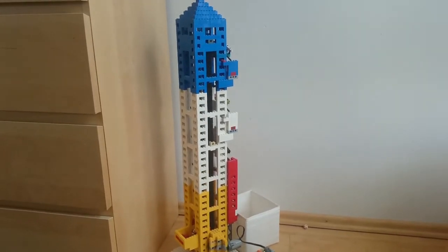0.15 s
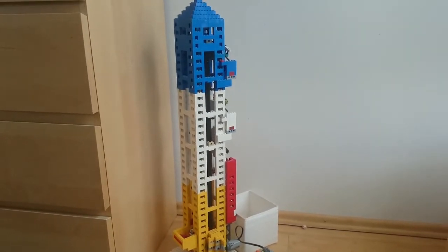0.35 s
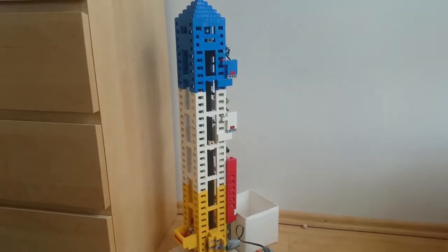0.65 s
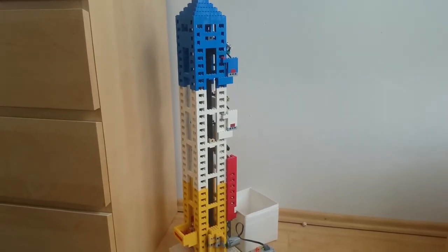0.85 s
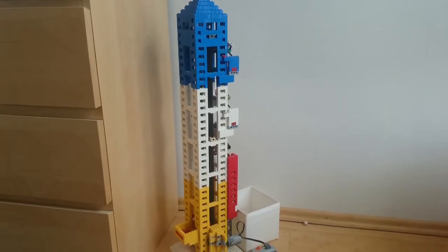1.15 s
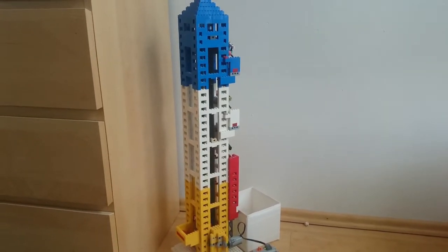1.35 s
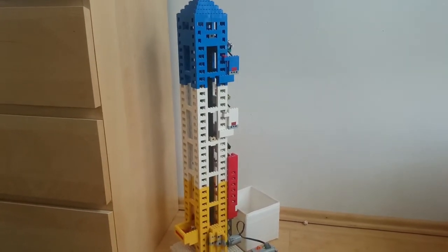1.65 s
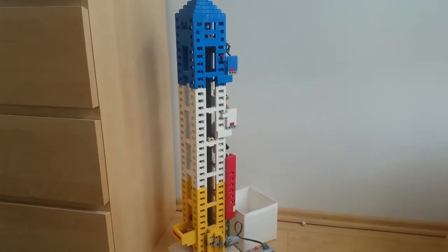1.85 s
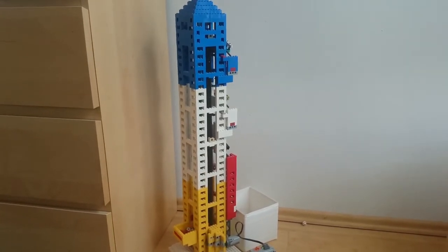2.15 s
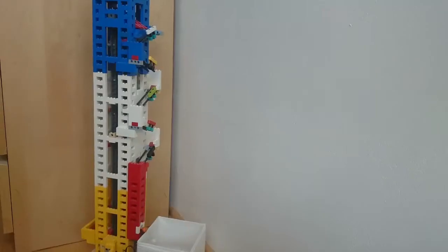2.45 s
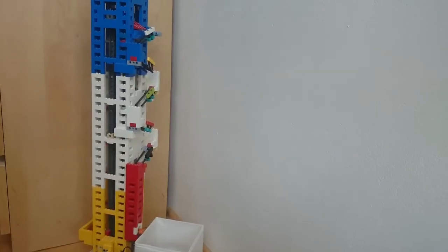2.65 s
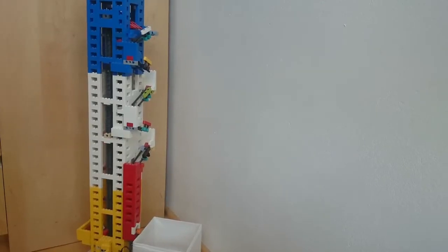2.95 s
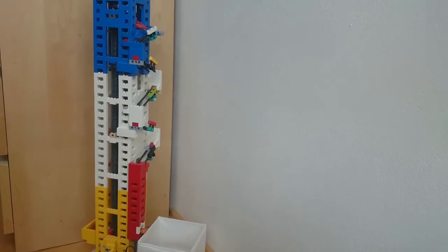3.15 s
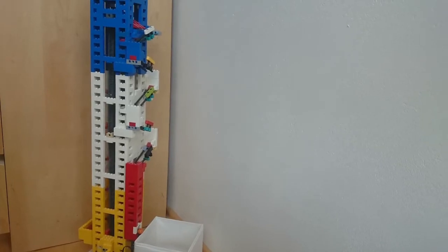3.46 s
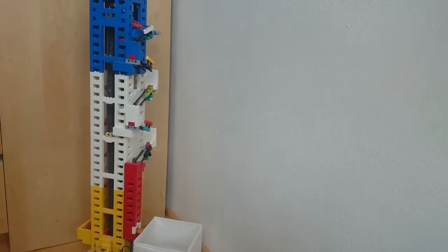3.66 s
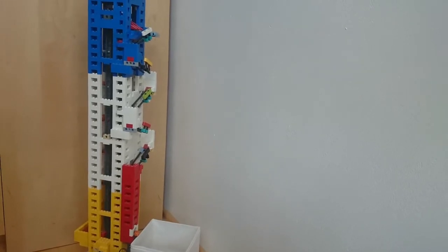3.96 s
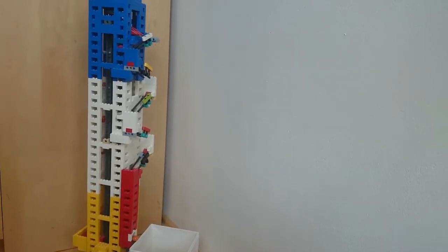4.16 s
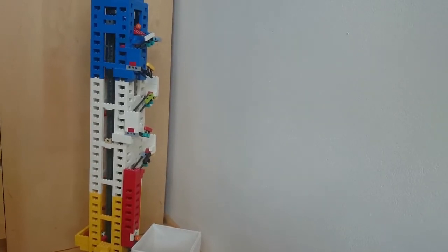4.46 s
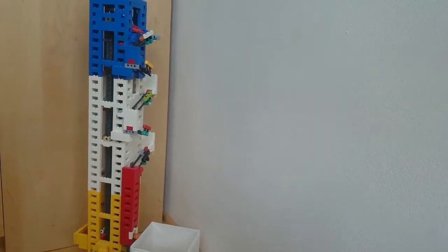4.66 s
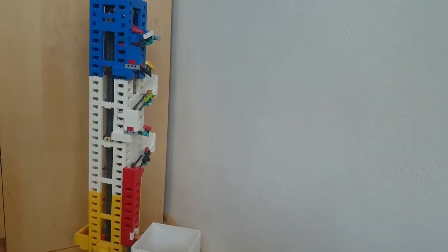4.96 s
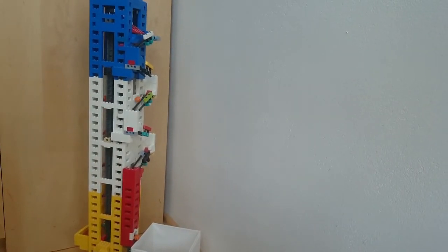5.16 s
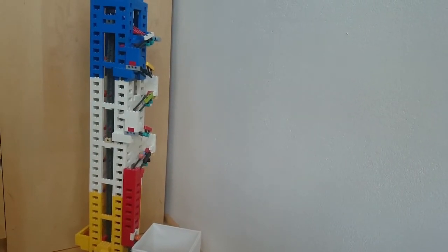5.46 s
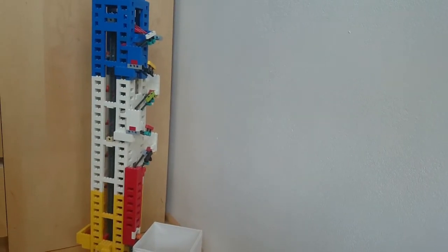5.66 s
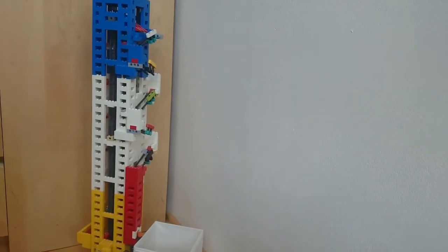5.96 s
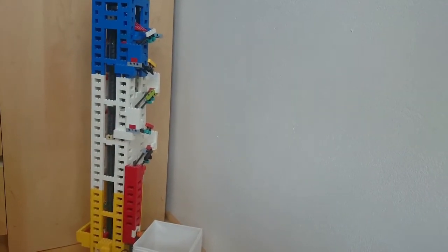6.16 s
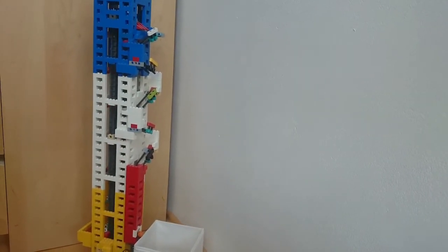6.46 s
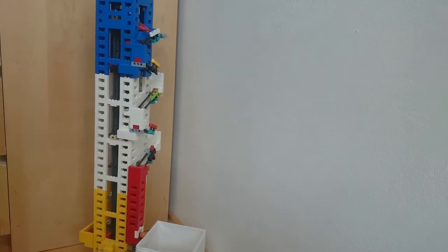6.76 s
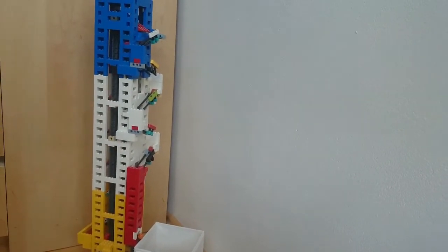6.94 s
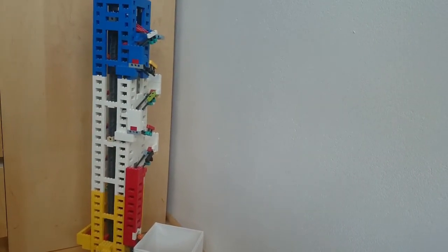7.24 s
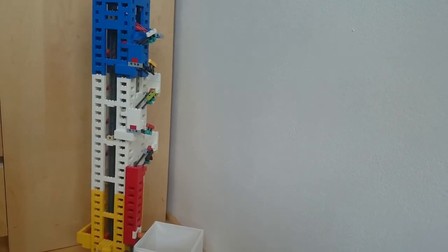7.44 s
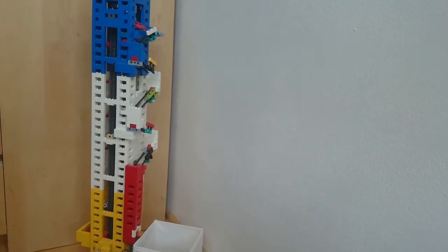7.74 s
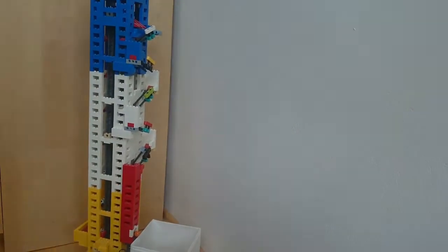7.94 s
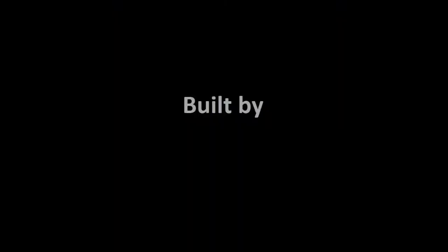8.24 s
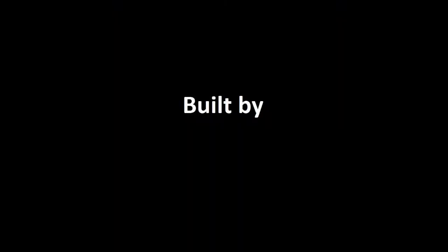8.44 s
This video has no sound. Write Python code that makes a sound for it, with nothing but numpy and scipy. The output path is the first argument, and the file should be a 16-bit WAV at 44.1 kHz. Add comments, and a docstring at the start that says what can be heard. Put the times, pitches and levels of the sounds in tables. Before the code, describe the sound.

In a small room, little hard balls knock down through a plastic brick tower with bright, dry clacks and brief rolling rattles. The first stretch is busy and slightly distant; then the microphone is nearer, with louder knocks and motor whir. A lull follows, then another dense tumble, a ball dropping in a bin, a few last clicks and an abrupt stop.

```python
"""Small hard balls knock down through a tower of plastic bricks in a small room, in bursts, until a sudden stop.
Each knock is a tick and a dying rattle that ring bricks, hollow shafts, ramps and stiff corners.
Between the knocks, clicks through the same modes make the rolling; one chute and one ramp sing.
A lifting motor whirs below, grains through casing modes over hiss; it is louder once the microphone is nearer."""
import sys
import numpy as np
from scipy import signal
from scipy.fft import rfft, irfft, next_fast_len
from scipy.io import wavfile
from scipy.ndimage import uniform_filter1d

SR = 44100
rng = np.random.default_rng(int(sys.argv[2]) if len(sys.argv) > 2 else 0)


def store_pcm(level_fs):
    """Save levels as 16-bit WAV."""
    pcm = np.round(np.clip(level_fs, -1, 1) * 32767).astype(np.int16)
    wavfile.write(sys.argv[1], SR, np.atleast_2d(pcm).T)


N = 379260
MOVE_S = 2.3   # from here on the microphone stands nearer to the motor

# Modes of the brick walls. Each row: frequency in Hz, width in Hz, relative level in dB.
BRICKS = [(3100, 930, -0.5), (3756, 1100, 5), (4200, 900, 0), (4940, 350, 2), (4920, 1160, 0),
          (5990, 960, 0.5), (5985, 600, 0), (7400, 1000, -16)]
# Modes of the tower's hollow shafts, heard close. Each row: frequency in Hz, width in Hz, relative level in dB.
SHAFTS = [(336, 400, -10.5), (410, 200, -12.5), (603.6, 50, -7.5), (880, 120, -4.5), (1000, 196, -8),
          (1380, 102, -3)]
# How each shaft mode differs from afar, before the move. Each entry: change in dB.
FAR_SHAFTS_DB = [1, 5.5, -7, 2, 3.5, 1]
# Modes of the long ramps. Each row: frequency in Hz, width in Hz, relative level in dB.
RAMPS = [(1540, 350, -1), (1920, 320, 2), (2503, 500, 0), (2737, 92, 2)]
# Modes of the stiff corners. Each row: frequency in Hz, width in Hz, relative level in dB.
CORNERS = [(8930, 1000, 5), (9900, 2500, -0.5), (12800, 4700, -4), (15790, 1600, -14.5)]


def amp(db):
    """dB to gain."""
    return 10 ** (np.asarray(db) / 20)


def rms_one(x):
    """Scale to rms 1."""
    return x / np.sqrt(np.mean(x ** 2) + 1e-20)


def peak_one(rows):
    """Scale each row so that its loudest 2 ms match a sine of height 1."""
    power = uniform_filter1d(rows ** 2, size=88, axis=1).max(axis=1, keepdims=True)
    return rows / np.sqrt(2 * power + 1e-20)


def drift(rate_hz):
    """Slow random wander of spread 1: noise through two equal low-pass poles, one point per 40 samples."""
    r = np.exp(-2 * np.pi * rate_hz * 40 / SR)
    noise = rng.standard_normal(N // 40 + 2002)
    slow = signal.lfilter([1], [1, -2 * r, r * r], noise)[2000:]   # the filter has settled by then
    return np.interp(np.arange(N) / 40, np.arange(len(slow)), rms_one(slow))


def grains(per_s, spread_db):
    """Random clicks of uneven size and either sign."""
    sizes = amp(spread_db * np.minimum(rng.exponential(1, N), 4)) * rng.choice([-1, 1], N)
    return sizes * (rng.random(N) < per_s / SR)


def resonance(hz, width_hz, size):
    """Complex response of two-pole modes, 1 on top, on the FFT grid; one row per mode."""
    r = np.exp(-np.pi * np.reshape(width_hz, (-1, 1)) / SR)
    z = np.exp(-2j * np.pi * np.arange(size // 2 + 1) / size)   # one sample of delay
    c = np.cos(2 * np.pi * np.reshape(hz, (-1, 1)) / SR)
    return (1 - r * r) / 2 * (1 - z * z) / (1 - 2 * r * c * z + r * r * z * z)


def high_pass(hz, size):
    """Complex response of a steep high-pass on the FFT grid."""
    sos = signal.butter(4, hz, "high", fs=SR, output="sos")
    return signal.sosfreqz(sos, np.arange(size // 2 + 1) * SR / size, fs=SR)[1]


def body(modes, x):
    """A long sound through parallel modes of alternating sign; rms 1."""
    size = next_fast_len(N + SR // 4)
    hz, width_hz, db = np.transpose(modes)
    response = (amp(db) * (-1) ** np.arange(len(hz))) @ resonance(hz, width_hz, size)
    return rms_one(irfft(rfft(x, size) * response, size)[:N])


def add(out, s, sound):
    """Lay a sound into out at time s."""
    i = max(round(s * SR), 0)
    out[i:i + len(sound)] += sound[:N - i]


def knocks(favour_db, lower_db, ring_width_hz, lower_q, tick_db):
    """A tick and a dying rattle of loose joints strike every mode anew, most at the spot's own rings."""
    # Ball knocks. Each row: start in seconds, brick peak in dB, brightest ring in Hz, rattle T60 in seconds,
    # ramp peak in dB re the bricks, corner crack in dB re the bricks.
    knock_rows = [(.0094,-19,5200,0.032,-30,-23),(.0498,-22,4490,0.072,-21,-21),(.1378,-15.5,5860,0.038,-19,-11),(.179,-22.5,4130,0.11,-15,-22),
                  (.2033,-20.5,5990,0.055,-7.5,-12),(.24,-22.5,5000,0.042,-11,-40),(.255,-31,4100,0.11,-1,-25),(.3803,-17,5740,0.039,-15,-9),
                  (.4265,-22.5,6650,0.068,-7.5,-8),(.4766,-26,3520,.06,-13,-22),(.536,-18,5800,0.084,-31,-10.5),(.5944,-19,4100,0.05,-11,-10),
                  (.6859,-10.5,4070,0.036,-26,-49),(.8041,-17,5070,0.08,-12,-41),(.841,-26,3400,0.097,-12,-26),(.897,-26,3800,0.07,-36,-27),
                  (.9847,-26,5100,0.23,-8,-50),(1.017,-15.5,4560,0.051,-22,-39),(1.075,-26,5130,0.13,-6,-9),(1.1239,-18.5,5450,0.24,-13.5,-12),
                  (1.1449,-8,5570,0.057,-21.5,-43),(1.1549,-23.5,3270,0.25,-3.5,-7),(1.2155,-22,5640,0.058,-12,-32),(1.232,-21.5,5570,0.068,-25,-24),
                  (1.2855,-24,3170,0.094,-18,-23),(1.3148,-15,5800,0.092,-30,-22),(1.348,-19,4920,0.16,-13,-14),(1.375,-19,3610,0.068,-7,-29),
                  (1.3838,-17,2840,0.19,-16,-37),(1.482,-28.5,4160,0.23,-2,-32),(1.558,-36,4060,0.07,-4,-21),(1.606,-36,3930,.065,-9,-19),(1.6372,-28.5,3440,.06,-24,-31),
                  (1.7,-21.5,3640,0.044,-10,-13),(1.7735,-20,5800,0.05,-24,-12),(1.7928,-20.5,4970,0.2,-7.5,-31),(1.8248,-21,3980,.046,-28,-27),
                  (1.833,-21,5200,0.082,-7,-25),(1.857,-19,4080,.066,-12,-20),(1.875,-26,3600,.06,-23,-12),(1.9085,-19,6000,0.046,-18,-14),
                  (1.9467,-16.5,3730,0.074,-9,-15),(1.9899,-24.5,3500,.06,-4,-7),(2.0242,-30.5,3970,0.094,-3,-18),(2.0734,-27.5,3950,.055,-8,-19),
                  (2.1617,-20.5,3940,0.061,-13.5,-12),(2.2194,-25,5800,0.08,-6.5,-11),(2.2766,-28,3500,0.043,-12.5,-9),(2.3121,-15,4920,0.099,-11.5,-14),
                  (2.3236,-23.5,5970,0.063,-2,-21.5),(2.3621,-21.5,4100,0.074,-12.5,-24.5),(2.4074,-34,6500,0.11,0.5,-26),(2.4513,-26,5760,0.18,-18,-24),
                  (2.5213,-9,4820,0.059,-23,-37),(2.559,-22,4770,0.031,-26.5,-29),(2.6676,-5.5,3810,0.077,-18,-12.5),(2.6803,-23,4040,0.057,-22,-15.5),
                  (2.7295,-22,3970,.072,-11,-12),(2.7744,-24.5,4240,0.038,-25,-27.5),(2.8115,-27.5,3140,0.078,-12,-21),(2.8584,-19,3500,0.087,-6,-24.5),
                  (2.8946,-5,4750,0.071,-9,-18),(2.9075,-25,4750,.056,-21,1),(2.9394,-20.5,4050,0.042,-11,-21),(2.9854,-23,4940,0.15,0,-7),
                  (3.0128,-26,4530,0.11,-0.5,-25),(3.0644,-20.5,4700,0.033,-4.5,-30),(3.0729,-13.5,3900,0.043,-8,-35),(3.133,-29,3600,0.097,1.5,-23),
                  (3.1894,-31.5,6440,0.041,-5,-17),(3.2325,-32.5,6660,0.13,3,-14),(3.5959,-19,4840,.049,-5.5,-25),(3.6032,-22,5700,0.094,-4.5,-7),
                  (3.6191,-20.5,4360,0.083,-7,-12.5),(3.6681,-31,6600,.067,-3,-15),(4.628,-24,3550,0.062,-23,-27),(4.6392,-25,3330,0.053,-6,-31),
                  (4.6514,-26,4070,0.066,-4,-53),(4.6835,-27,6500,0.34,-3.5,-20),(4.7596,-26.5,4170,0.091,-8.5,-6),(4.8271,-27,3520,0.054,-14,-23),
                  (4.9132,-19.5,5360,0.048,-13,-2.5),(4.935,-21.5,3900,0.05,-11,-14),(4.9442,-30.5,4320,0.089,0.5,3),(5.0236,-26,3970,0.11,-8,-10),
                  (5.0843,-33,6600,0.062,-14,-16),(5.1357,-28,4100,0.049,-7,-21),(5.2093,-31,3400,0.083,-8,-14),(5.2403,-19,5750,0.056,-7.5,-9),
                  (5.2545,-24.5,3860,0.075,0,-9),(5.3131,-18,4160,0.12,-10,-13),(5.3545,-24,3930,0.057,-7.5,-18),(5.4019,-21,3680,0.044,-7,-17),
                  (5.442,-14,5750,0.07,-12.5,-5.5),(5.4589,-19,4650,0.044,-3,-13),(5.5089,-21.5,5560,0.093,-2.5,-24),(5.5726,-25.5,3900,.081,-22,-14),
                  (5.6247,-11.5,4900,0.032,-17.5,-13.5),(5.6782,-28.5,4100,0.14,-6.5,-18.5),(5.7756,-26,4270,.047,-27,-10),(5.7911,-15.5,6420,0.049,-7,-8),
                  (5.836,-13,5760,0.032,-22,-17),(5.878,-29,4070,0.048,-5,-11),(5.9343,-2.5,4550,0.056,-27.5,-49),(5.9464,-12,4450,0.077,-18.5,-31),
                  (5.995,-21,4500,.06,-16,-16),(6.0019,-10.5,4830,0.085,-21,-13),(6.0226,-18,5370,.1,-11.5,-8),(6.0294,-14.5,5240,0.085,-24,-15),(6.105,-30,4970,.06,-30.5,-26),(6.1142,-25,5050,0.097,-40,-24),
                  (6.1447,-18.5,4640,0.083,-24,-8),(6.1513,-18,4780,0.13,-10.5,-27),(6.1668,-12,4440,0.12,-13.5,-39),(6.2133,-18,4300,0.023,-22,-28),
                  (6.2412,-22.5,4270,.043,-22,-29),(6.3654,-34,4100,0.11,-29,-25),(6.4223,-36,3770,0.037,10,-24),(6.4254,-31,3560,.027,7,-26),
                  (6.4394,-25.5,3500,0.078,-2.5,-19),(6.5742,-39,6700,0.11,4.5,1),(6.888,-40,4000,.05,0,-12),(7.095,-41,4000,.05,-4,-12),(7.1554,-24.5,4930,0.12,-6,-14),(7.1866,-29,3080,0.16,1,-9),
                  (7.2147,-19.5,5000,0.073,-8,-6),(7.2513,-29.5,6660,0.19,-3,-10),(7.2823,-23.5,4400,0.16,-3,-20),(7.3103,-22.5,2960,0.13,-4,-20),(7.667,-37,6600,0.26,-4.5,-6)]
    focus_db_per_octave = 2.5   # brick modes weaken away from the struck spot's ring
    lower_ring_hz, lower_spread = 2670, 0.096   # a favoured ramp ring and its relative scatter
    thud_db = -7.5   # hollow shafts re the ramps
    s, peak_db, ring_hz, t60_s, deep_db, crack_db = np.transpose(knock_rows)
    size = 8192
    t = np.arange(size) / SR
    dying = amp(-60 * t / np.clip(t60_s, .01, .2)[:, None])
    push = rng.standard_normal((len(s), size)) * dying
    push[:, 0] += amp(tick_db)
    push = rfft(push)

    def struck(modes, change_db=0):
        """Each knock weights the modes by chance, with alternating signs."""
        hz, width_hz, db = np.transpose(modes)
        scatter_db = 2.58 * rng.standard_normal((len(s), len(hz)))
        strength = amp(db + scatter_db + change_db) * (-1) ** np.arange(len(hz))
        return strength @ resonance(hz, width_hz, size)

    octaves_away = np.abs(np.log2(np.transpose(BRICKS)[0] / ring_hz[:, None]))
    bricks = struck(BRICKS, -focus_db_per_octave * octaves_away)
    bricks += amp(favour_db) * resonance(ring_hz, ring_width_hz, size)
    shafts = struck(SHAFTS, np.outer(s < MOVE_S, FAR_SHAFTS_DB))
    ramps = struck(RAMPS)
    lower_hz = lower_ring_hz * (1 + lower_spread * rng.standard_normal(len(s)))
    ramps += amp(lower_db) * resonance(lower_hz, lower_hz / lower_q, size)
    corners = struck(CORNERS)

    # response, lower edge in Hz (small parts radiate little below their lowest mode), peak in dB
    parts = [(bricks, 2400, peak_db),
             (shafts, 356, peak_db + deep_db + thud_db),
             (ramps, 1418, peak_db + deep_db),
             (corners, 7500, peak_db + crack_db)]
    blows = np.zeros((len(s), size))
    for response, edge_hz, level_db in parts:
        ring = irfft(push * response * high_pass(edge_hz, size), size)
        blows += amp(level_db)[:, None] * peak_one(ring)
    out = np.zeros(N)
    for at, blow in zip(s, blows):
        add(out, at, blow)
    return out


def chute(rise_s):
    """Each tap swells quickly into a short hollow note, a little off pitch every time."""
    # Balls that set one chute ringing. Each row: start in seconds, level in dB before swell and flutter.
    taps = [(2.8176,-34.5),(2.8637,-32),(2.8961,-34.5),(2.9896,-33),(3.02,-28),(3.2249,-36),(3.601,-25),(4.6357,-29.5),(4.8324,-35),
            (4.882,-28),(4.92,-26),(4.9473,-25),(4.982,-28.5),(5.0262,-27),(5.0876,-26.5),(5.2403,-36),(5.3585,-31),(5.4598,-32.5),(5.5044,-30),
            (5.5566,-28.5),(5.6284,-32),(5.7005,-34.5),(6.003,-42),(6.03,-42),(6.5473,-30),(6.567,-34),(6.628,-36),(7.1564,-38),(7.22,-23)]
    centre_hz, t60_s = 1389, 0.047
    out, t = np.zeros(N), np.arange(5000) / SR
    rough = amp(2.5 * drift(60))   # the ball keeps touching, so the note flutters
    for s, level_db in taps:
        i = round(s * SR)
        hz = centre_hz * (1 + 0.013 * rng.standard_normal())
        shape = (1 - np.exp(-t / rise_s)) * amp(level_db - 60 * t / t60_s)
        add(out, s, shape * rough[i:i + len(t)] * np.sin(2 * np.pi * hz * t))
    return out


def rolling():
    """Balls bump over studs and each other: clumped small clicks, each stream touching other bricks."""
    # Balls rolling and jostling, joined by straight lines. Each row: time in seconds, rattle gain in dB.
    roll_levels = [(0,-27),(.1,-40),(.22,-37.5),(.34,-43.5),(.56,-40.5),(.76,-43),(1.22,-41.5),(1.33,-30.5),(1.48,-45),(1.76,-40.5),(1.93,-30.5),(2.1,-43.5),(2.74,-45),(2.95,-32.5),(3.1,-41.5),
                   (3.34,-47),(4.5,-50.5),(4.82,-42),(5.23,-45),(5.36,-32),(5.5,-38.5),(5.86,-39.5),(6.55,-44),(6.82,-50),(7.7,-49)]
    rumble_db = -11.0   # hollow rumble re the rattle
    t = np.arange(N) / SR
    crowd = amp(6.1 * drift(14))
    soft_corners = [(hz, width_hz, db - 12.0) for hz, width_hz, db in CORNERS]
    modes = RAMPS + BRICKS + soft_corners
    streams = [body(modes[k::3], grains(450 * crowd, spread_db=1.5)) for k in range(3)]
    rattle = rms_one(sum(streams))
    bumps = grains(900 * crowd, spread_db=5.0) + grains(1600, spread_db=3.0)
    far_shafts = [(hz, width_hz, db + far_db) for (hz, width_hz, db), far_db in zip(SHAFTS, FAR_SHAFTS_DB)]
    rumble = np.where(t < MOVE_S, body(far_shafts, bumps), body(SHAFTS, bumps))
    return amp(np.interp(t, *np.transpose(roll_levels))) * (rattle + amp(rumble_db) * rumble)


def singing_ramp():
    """Fine bumps ring one ramp mode, swelling fast and fading slowly as each ball passes."""
    # A ramp that sings while a ball rolls along it. Each row: loudest moment in seconds, gain there in dB.
    passes = [(4.0,-52),(4.04,-51),(4.125,-54),(4.215,-45),(6.165,-28)]
    # The mode that sings. Each row: frequency in Hz, width in Hz, relative level in dB.
    ramp_mode = [(2810, 70, 0)]
    swell_db_per_s, fade_db_per_s = 400, 184
    t = np.arange(N) / SR
    gain = np.zeros(N)
    for s, db in passes:
        below_db = np.where(t < s, swell_db_per_s * (s - t), fade_db_per_s * (t - s))
        gain += amp(db - below_db)
    return gain * body(ramp_mode, grains(249, spread_db=3.5))


def bin_drops(t60):
    """A short dying rattle rings the hollow collecting bin."""
    # Balls landing in the bin. Each row: start in seconds, relative level of the rattle in dB.
    landings = [(3.596, -37), (6.4235, -23)]
    # Modes of the bin. Each row: frequency in Hz, width in Hz, relative level in dB.
    bin_modes = [(480, 160, -6), (690, 270, 2), (920, 470, 1.5)]
    push, t = np.zeros(N), np.arange(4000) / SR
    for s, level_db in landings:
        add(push, s, amp(level_db - 60 * t / t60) * rng.standard_normal(len(t)))
    ring = body(bin_modes, push)
    return ring * np.abs(push).max() / np.abs(ring).max() / 2   # half as high as the push


def thumps(cycles):
    """Low bumps that fall in pitch and die within a cycle or two."""
    # Dull bumps. Each row: start in seconds, level in dB before the decay, pitch they settle towards in Hz.
    bumps = [(0.766, -44, 129), (1.991, -34, 280), (4.25, -21, 331), (6.173, -35, 340)]
    out, t = np.zeros(N), np.arange(2000) / SR
    for s, level_db, hz in bumps:
        turns = hz * t + 0.46 * (1 - np.exp(-t * hz * 2.1))
        add(out, s, amp(level_db) * np.sin(2 * np.pi * turns) * np.exp(-t * hz / cycles))
    return out


def motor():
    """Gear teeth and brushes scrub: dense grains and stray ticks ring the casing over hiss and a faint hum."""
    # Modes of the motor casing. Each row: frequency in Hz, width in Hz, relative level in dB.
    casing = [(1694, 30, -14.5), (2774, 61, -42), (3990, 33, -2.5), (4300, 220, -9), (4460, 26, -18),
              (5460, 300, -31), (6524, 100, -0.5), (6604, 71, -3), (6694, 59, 0), (6960, 200, -19.5),
              (8400, 120, -26.5)]
    # Colour of gears and room air. Each row: frequency in Hz, relative level in dB per Hz.
    hiss_colour = [(30, -23), (70, -16), (200, -32), (600, -22), (1500, -33), (4200, -13.5), (5500, -13),
                   (7200, -9.5), (8700, -16.5), (11000, -17), (12500, -14), (14800, -14.5), (16400, -13)]
    # Hum heard before and after the move alike. Each row: frequency in Hz, width in Hz, level in dB rms.
    steady_hum = [(124, 4.7, -69.5)]
    # A gear tone heard only before the move. Each row: frequency in Hz, width in Hz, level in dB before wavering.
    far_hum = [(435, 14, -65)]
    moved = np.arange(N) / SR > MOVE_S
    whine_db = np.where(moved, -41.5, -46.5)   # near, far
    hiss_db = np.where(moved, -40.5, -43.5)

    scrub = grains(3600, spread_db=4.0) * amp(drift(30))
    ticks = amp(11.5) * grains(25, spread_db=1.5)
    whine = body(casing, scrub + ticks)

    size = next_fast_len(N)
    hz, db = np.transpose(hiss_colour)
    grid_hz = np.arange(size // 2 + 1) * SR / size
    colour = amp(np.interp(np.log(grid_hz + 1), np.log(hz), db))
    hiss = rms_one(irfft(rfft(rng.standard_normal(N), size) * colour, size)[:N])
    hiss *= amp(drift(8.4))

    hum = amp(steady_hum[0][2]) * body(steady_hum, rng.standard_normal(N))
    far_gain = amp(far_hum[0][2] + 4.3 * drift(2.5)) * ~moved
    hum += far_gain * body(far_hum, rng.standard_normal(N))
    return amp(whine_db) * whine + amp(hiss_db) * hiss + hum


def room(x):
    """Wall echoes as a dense noise tail that builds up over 6.5 ms, the treble dying faster."""
    t60_s, wall_cut_hz = 0.35, 4300
    t = np.arange(SR // 2) / SR
    white = rng.standard_normal((2, len(t)))
    low_pass = signal.butter(1, wall_cut_hz, fs=SR, output="sos")
    dull = signal.sosfilt(low_pass, white[0]) * amp(-60 * t / t60_s)
    bright = .4 * white[1] * amp(-60 * t / (0.57 * t60_s))
    tail = (dull + bright) * np.clip(t / 0.0065, 0, 1)
    return signal.fftconvolve(x, tail / np.sqrt(np.sum(tail ** 2)))[:N]


def scene():
    """Knocks and rolling fill the room; the motor and the dull bumps reach the microphone without it."""
    room_db = -10.5
    tower = knocks(favour_db=5.5, lower_db=6.5, ring_width_hz=450, lower_q=12.0, tick_db=11.5)
    tower += chute(rise_s=0.0023)
    tower += rolling()
    tower += singing_ramp()
    tower += bin_drops(t60=0.034)
    return (tower + amp(room_db) * room(tower) + thumps(cycles=0.32) + motor())[None]


def record(dry):
    """The microphone drops the deep bass, the top is cut, and the sound stops within a few ms."""
    low_cut_hz, top_cut_hz, stop_s = 45, 16100, 7.9455
    gate = np.clip((stop_s - np.arange(N) / SR) / .004, 0, 1)
    thin = signal.sosfilt(signal.butter(4, low_cut_hz, "high", fs=SR, output="sos"), dry)
    return signal.sosfilt(signal.cheby2(14, 60, top_cut_hz, fs=SR, output="sos"), thin * gate)


dry = scene()
out = record(dry)
store_pcm(out)
```